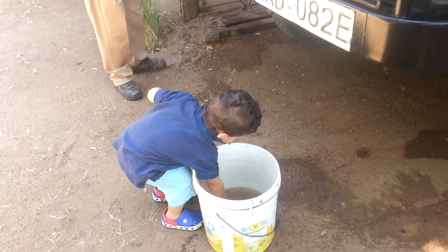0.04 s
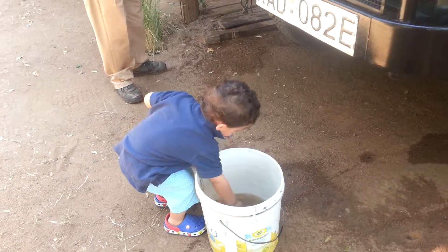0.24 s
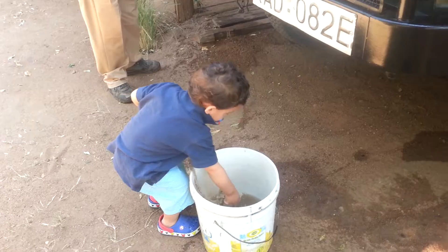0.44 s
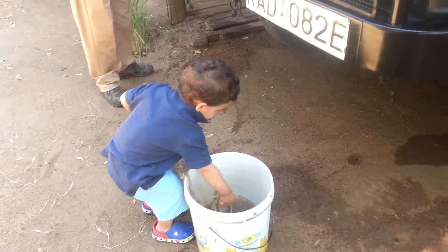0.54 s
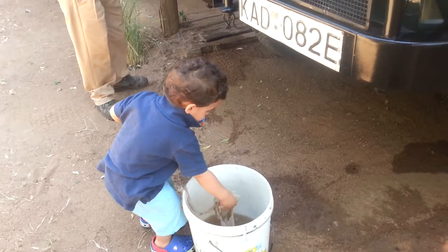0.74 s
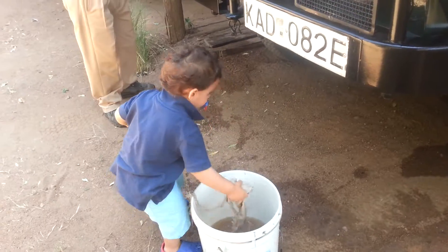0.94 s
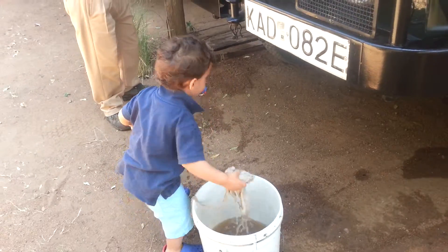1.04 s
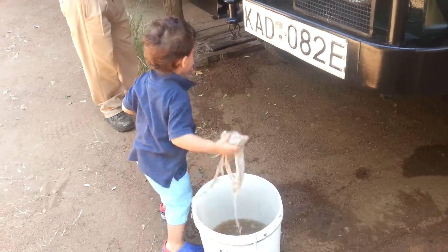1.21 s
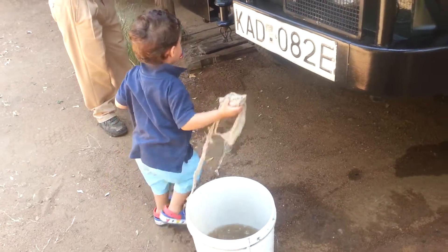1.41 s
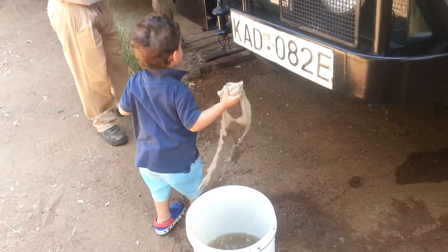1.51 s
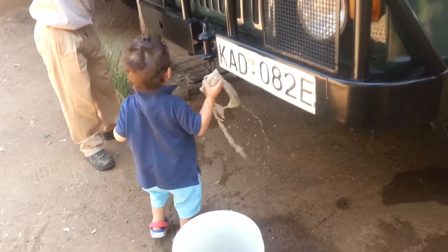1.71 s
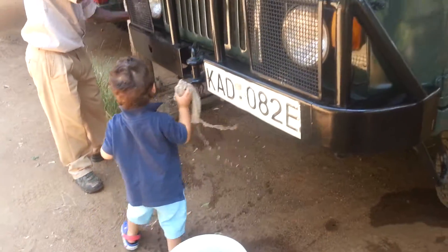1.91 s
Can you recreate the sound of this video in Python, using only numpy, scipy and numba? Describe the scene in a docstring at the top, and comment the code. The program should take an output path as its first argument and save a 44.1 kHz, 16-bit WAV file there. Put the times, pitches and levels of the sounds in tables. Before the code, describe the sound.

Water sloshes and drips as a wet rag is swished and lifted from a plastic bucket

```python
"""Open-air hush, a cricket's trill and a thin run of water are heard first; then a rag is swished in a plastic
bucket of water outdoors and lifted so that it drains back and onto the ground.
Water sounds are sums of decaying sines, one per bubble: large bubbles ring out among a few weaker neighbours,
drops and ticks free a few, splashes burst into dense clouds. Spray and open air are filtered noise; cricket,
a faint tone and a knock on the bucket wall are sines. Bucket mouth and wall colour and echo the bubbles."""
import sys
import numpy as np
from scipy import signal
from scipy.fft import rfft, irfft, next_fast_len
from scipy.io import wavfile
from scipy.ndimage import uniform_filter1d
from numba import njit

SR = 44100
rng = np.random.default_rng(int(sys.argv[2]) if len(sys.argv) > 2 else 0)


def wrap_up_sound(samples):
    """Save the sound to the file named by the first command line argument, as 16-bit audio."""
    columns = np.atleast_2d(samples).T
    # keep every value between -1 and 1, then stretch to whole-number steps
    tamed = np.clip(columns, -1, 1)
    steps = np.round(tamed * 32767).astype(np.int16)
    wavfile.write(sys.argv[1], SR, steps)


def volts(x):
    """Linear amplitude factor 10**(x/20) for a level x in dB, scalar or array-like."""
    e = np.asarray(x, float) / 20
    return 10 ** e


N = 85995  # length in samples

# Levels of bubbles, drops, ticks, splashes and running water are set ahead of the bucket's colour and echo.
# Water running off: (time [s], level [dB])
RUNNING_WATER = [(0, -54), (.18, -60.5), (.25, -41.5), (.42, -52), (.6, -61), (.7, -48.5), (.82, -54),
                 (.9, -51), (1.0, -53.5), (1.1, -44.5), (1.25, -45.5), (1.36, -49.5), (1.45, -50.5),
                 (1.6, -45), (1.72, -49), (1.79, -63.5), (1.95, -80)]
# Steady treble hiss of the spray: (time [s], level [dB])
SPRAY_HISS = [(0, -58), (.6, -58), (.7, -55.5), (1.0, -55), (1.37, -56), (1.55, -53), (1.74, -54),
              (1.8, -59.5), (1.95, -62.5)]
# Spectrum of the open air: (frequency [Hz], relative density [dB per Hz])
AIR_SPECTRUM = [(15, -56), (25, -19), (196, 1), (462, -3.5), (769, -4.5), (952, -11.5), (2180, -12),
                (3830, -15.5), (6040, -40), (15000, -31.5)]
# Open air over time: (time [s], level [dB])
AIR_OVER_TIME = [(0, -55), (1.95, -55)]
# Likeness of the left and right air: (frequency [Hz], correlation [-1..1])
AIR_LIKENESS = [(60, 0.079), (300, 0.43), (1000, 0.13), (4000, -0.57), (12000, -0.17)]
# Cricket trills: (start [s], end [s], level [dB])
CRICKET_TRILLS = [(0, 0.25, -70.5), (0.373, 0.63, -69), (0.68, 0.895, -69.5), (0.962, 1.11, -66),
                  (1.64, 1.733, -64), (1.887, 1.96, -68)]
# Fundamental of a faint steady tone: (time [s], level [dB])
TONE_LEVEL = [(.68, -78), (.97, -61.5), (1.05, -59), (1.2, -56), (1.27, -81)]
# Splashes: (time [s], level [dB], centre pitch [Hz], pitch spread [octaves], decay [s])
SPLASH_EVENTS = [(.24, -27, 1870, 0.52, 0.011), (.262, -25, 1920, 0.63, 0.022),
                 (.297, -31.5, 1860, 0.7, 0.0074), (.311, -42, 2060, 1.2, 0.0042),
                 (0.346, -36, 2060, 0.4, 0.0079), (0.886, -37.5, 1920, 0.49, 0.025),
                 (1.087, -33, 3660, 0.39, 0.033), (1.191, -28, 4520, 0.77, 0.066),
                 (1.26, -40.5, 512, 0.12, .04), (1.272, -34.5, 2130, 0.11, .004),
                 (1.429, -29.5, 2850, 0.11, 0.0079), (1.18, -32, 2650, 0.79, .015),
                 (1.318, -33, 2230, 0.18, 0.016), (1.41, -34, 2060, 0.51, 0.0057),
                 (1.566, -21.5, 1910, 0.43, 0.0063), (1.57, -28, 3800, 0.89, 0.014),
                 (1.615, -37, 1880, 0.22, 0.061)]
# Drops hitting the surface: (time [s], level [dB], pitch [Hz], left minus right [dB])
DROP_HITS = [(0.2467, -24, 1380, 1), (0.2575, -17, 2030, 0), (0.2603, -18, 1540, 2), (0.299, -28, 1600, 2),
             (0.4843, -41.5, 3860, -4), (0.6389, -40, 3480, -6), (0.682, -36.5, 3630, 2),
             (0.697, -31, 4120, 2), (0.8439, -23.5, 2720, 12.5), (0.8485, -28.5, 2950, -19),
             (0.8805, -32.5, 3120, -5), (0.8878, -35, 2010, 7), (0.9285, -29.5, 3740, -6),
             (0.9877, -34.5, 3470, -5), (1.0275, -34, 3590, -7), (1.115, -45, 4200, -7),
             (1.1283, -35.5, 3640, -12), (1.132, -32, 5260, 14), (1.1668, -28, 3840, 1),
             (1.1846, -22, 3800, -5.5), (1.2082, -21.5, 3760, -7), (1.2267, -25, 4900, 7.5),
             (1.232, -44, 4940, 18), (1.267, -24, 4290, -3), (1.391, -29, 3860, -5.5),
             (1.4805, -34, 3880, -6), (1.5105, -33.5, 3740, -6), (1.534, -19.5, 4910, 9.5)]
# Fine spray ticks: (time [s], level [dB], pitch [Hz], left minus right [dB])
SPRAY_TICKS = [(0.2583, -55, 7600, -3), (0.3101, -36, 7500, -5), (0.8878, -38, 11100, 0.5),
               (0.9108, -30.5, 10200, 6), (1.0205, -31.5, 7800, -6), (1.0278, -32, 8400, -5),
               (1.0353, -33, 6860, 6), (1.09, -25, 6360, 9), (1.1095, -37, 6500, 2),
               (1.1147, -30, 12800, 13), (1.1235, -26, 6050, 8), (1.128, -28, 10700, 0),
               (1.1493, -29, 9500, -3), (1.2525, -34, 8700, -7), (1.2632, -35, 11000, -2),
               (1.2675, -27.5, 9900, 1), (1.412, -26, 9000, -7), (1.5317, -18, 10640, 7),
               (1.609, -34.5, 8700, -12)]
# Large bubbles: (time [s], level [dB], pitch [Hz], ring t60 [s])
LARGE_BUBBLES = [(0.343, -42.5, 934, 0.016), (0.388, -39, 1496, 0.011), (0.694, -46.5, 1340, 0.017),
                 (0.716, -51, 1996, 0.03), (0.904, -49, 1310, 0.029), (1.06, -42.5, 1128, 0.029),
                 (1.077, -37, 798, 0.018), (1.091, -44.5, 744, 0.031), (1.129, -41, 770, 0.023),
                 (1.167, -38, 770, 0.03), (1.185, -41, 1247, 0.02), (1.19, -43.5, 756, 0.033),
                 (1.22, -41.5, 2014, 0.021), (1.2628, -29.5, 2216, 0.011), (1.412, -28.5, 1140, 0.0262),
                 (1.483, -47, 1673, 0.017), (1.723, -44.5, 724, 0.014)]
# Knock on the bucket wall: (time [s], level [dB], pitch [Hz], ring t60 [s])
WALL_KNOCK = [(1.566, -34, 299, 0.036)]
# Colour that the bucket mouth gives the water: (frequency [Hz], gain [dB])
MOUTH_GAIN = [(120, -26), (550, -1), (850, 2.5), (2000, 0), (2900, -3.5), (3900, 2), (5500, -2),
              (14000, 2.5)]


def over_time(table, column):
    """Linear interpolation: one column of a table at every sample."""
    a = np.array(table, float)
    return np.interp(np.arange(N) / SR, a[:, 0], a[:, column])


def on_hz(table, hz):
    """Spectral interpolation: a table read on a logarithmic frequency axis."""
    a = np.array(table, float)
    return np.interp(np.log(hz + 1), np.log(a[:, 0]), a[:, 1])


def band(lo_hz, hi_hz):
    """Filtered noise: two unrelated band noises with a joint rms of 1."""
    bandpass = signal.butter(2, [lo_hz, hi_hz], "band", fs=SR, output="sos")
    noise = signal.sosfilt(bandpass, rng.standard_normal((2, N)))
    return noise / noise.std()


@njit
def ring(g, sr, n):
    """Damped oscillation: each grain swells, rings as its pitch glides, and decays."""
    # grain: (time [s], pitch [Hz], t60 [s], rise [s], glide [1/s], left gain, right gain, decay shape)
    out = np.zeros((2, n))
    for r in range(len(g)):
        start, phase = int(g[r, 0] * sr), 0.
        for j in range(min(int(g[r, 2] * sr), n - start)):
            t = j / sr
            hz = min(g[r, 1] * (1 + g[r, 4] * t), .45 * sr)
            phase += 6.2831853 * hz / sr
            decay = np.exp(-6.9 * (t / g[r, 2]) ** g[r, 7])
            swell = 1 - np.exp(-t / g[r, 3])
            v = np.sin(phase) * decay * swell
            out[0, start + j] += g[r, 5] * v
            out[1, start + j] += g[r, 6] * v
    return out


def grains(s, hz, cycles, db, pan_db, rise=.07, glide=.2, shape=1.):
    """Scaling of oscillators: t60 in cycles, rise as a share of t60, glide as pitch share gained over t60."""
    hz = np.clip(hz, 100, 14000)
    t60 = np.maximum(cycles, 1) / hz
    left, right = volts(db + pan_db / 2), volts(db - pan_db / 2)
    columns = np.broadcast_arrays(np.maximum(s, 0), hz, t60, t60 * max(rise, 1e-3), glide / t60,
                                  left, right, shape)
    return np.column_stack(columns)


def cluster(s, db, hz, pan_db, length, octaves, count, cycles, scatter_db, pan_scatter_db,
            rest_db=0, rise_s=0):
    """Exponential arrivals: a leading bubble on the given pitch, the rest thinning out and fading."""
    u, z = rng.random((count, 3)).T, rng.standard_normal((count, 3)).T
    rest = np.minimum(np.arange(count), 1)  # 0 for the leading bubble, 1 for the others
    late = -np.log(1 - .95 * u[0]) * rest
    times = s + late * length + rise_s * u[2]
    pitches = hz * 2 ** (rest * octaves * 1.96 * np.tanh(z[0] / 2.18))
    levels = db + rest * (rest_db - 4 * late + scatter_db * z[1])
    pans = pan_db + rest * pan_scatter_db * z[2]
    return grains(times, pitches, cycles * (1 + rest * (u[1] - .5)), levels, pans)


def bursts(events, db):
    """Exponential decay: an envelope set off by each event, db relative to the event's level."""
    t60_s = 0.038
    hits = np.zeros(N)
    for e in events:
        hits[int(e[0] * SR)] += volts(e[1] + db)
    return signal.lfilter([1], [1, -np.exp(-np.log(1000) / (t60_s * SR))], hits)


def trickle(count=4500):
    """Superposition of many small bubbles: levels follow the running water, a few stand out as patter."""
    u, z = rng.random((count, 3)).T, rng.standard_normal((count, 2)).T
    i = (u[0] * (N - 1)).astype(int)
    stand_out_db = -3.5 * np.log(1 - u[2])
    db = over_time(RUNNING_WATER, 1)[i] - 4 + stand_out_db
    pitches = 2700 * 2 ** (0.704 * z[0])
    return grains(u[0] * N / SR, pitches, 14 * (0.61 + u[1]), db, 5 * z[1])


def spray():
    """Band noise under envelopes: steady hiss, bright bursts at ticks, duller at drops and splashes."""
    crack_db, splash_hiss_db = -24.5, -19  # relative to the level of each event
    steady = band(2000, 16400) * volts(over_time(SPRAY_HISS, 1))
    bright = band(3200, 14500) * bursts(SPRAY_TICKS, crack_db)
    splash_envelope = uniform_filter1d(bursts(SPLASH_EVENTS, splash_hiss_db), size=150)
    dull = band(2400, 6600) * (splash_envelope + bursts(DROP_HITS, crack_db))
    return steady + bright + dull


def air():
    """Partly correlated noise: a hush whose mid and side shares set the likeness of left and right."""
    hz = np.arange(N // 2 + 1) * SR / N
    likeness = np.clip(on_hz(AIR_LIKENESS, hz), -.95, .95)
    mid, side = rfft(rng.standard_normal((2, N))) * volts(on_hz(AIR_SPECTRUM, hz))
    mid = irfft(mid * np.sqrt(1 + likeness), N)
    side = irfft(side * np.sqrt(1 - likeness), N)
    x = np.array([mid + side, mid - side])
    return x / x.std() * volts(over_time(AIR_OVER_TIME, 1))


def cricket():
    """Amplitude modulation: a high sine throbs at the stroke rate within smoothed trills."""
    pitch_hz, strokes_hz, stroke_depth = 5895, 275, 0.17
    t = np.arange(N) / SR
    trills = sum(volts(db) * ((t > a) & (t < b)) for a, b, db in CRICKET_TRILLS)
    gate = uniform_filter1d(trills, size=900)
    throb = 1 + stroke_depth * np.cos(2 * np.pi * strokes_hz * t)
    chirp = gate * throb * np.sin(2 * np.pi * pitch_hz * t)
    return chirp * volts(np.array([[1.5], [-1.5]]))  # left 3 dB above right


def tone():
    """Harmonic addition: a faint steady fundamental with its third partial."""
    pitch_hz, third_db = 1260, 0.5  # third partial relative to the fundamental
    phase = 2 * np.pi * pitch_hz * np.arange(N) / SR
    return volts(over_time(TONE_LEVEL, 1)) * (np.sin(phase) + volts(third_db) * np.sin(3 * phase))


def splashes():
    """Bubble clouds of many sizes: the small, short ones are set louder so that the cloud stays bright."""
    grain_db, rise = -9, .6  # one bubble relative to the splash; build-up as a share of the decay
    clouds = []
    for s, db, hz, octaves, decay in SPLASH_EVENTS:
        g = cluster(s, db + grain_db, hz, 0, decay, octaves, count=180, cycles=8.5,
                    scatter_db=2.5, pan_scatter_db=6.5, rise_s=rise * decay)
        g[:, 5:7] *= np.sqrt(g[:, 1:2] / hz)
        clouds.append(g)
    return np.vstack(clouds)


def drops():
    """Entrained bubbles: each drop frees a few near one size."""
    spread_s, ring_t60_s = .003, .005
    return np.vstack([cluster(s, db, hz, pan, spread_s, 0.11, count=6, cycles=ring_t60_s * hz,
                              scatter_db=4.5, pan_scatter_db=3.5, rest_db=-5)
                      for s, db, hz, pan in DROP_HITS])


def snaps():
    """Broadband impact: very short grains spread over octaves as each drop or tick lands."""
    return np.vstack([cluster(s, db - 10, hz * 1.6, pan, 0.0013 / 4, .5, count=4, cycles=5,
                              scatter_db=2, pan_scatter_db=4)
                      for s, db, hz, pan in DROP_HITS + SPRAY_TICKS])


def ticks():
    """Small-bubble resonance: spray ticks spread wider in pitch than drops."""
    return np.vstack([cluster(s, db, hz, pan, 0.0013, 0.23, count=6, cycles=18.8,
                              scatter_db=2.5, pan_scatter_db=12.5, rest_db=-8.5)
                      for s, db, hz, pan in SPRAY_TICKS])


def bubbles():
    """Bubble resonance: near-pure tones swell, hold and collapse, among a few smaller neighbours."""
    s, db, hz, t60 = np.array(LARGE_BUBBLES).T
    large = grains(s, hz, t60 * hz, db, 0, rise=.14, glide=.01, shape=3.2)
    neighbours = [cluster(s, db - 11, hz * 1.24, 0, t60 / 4, 0.46, count=5, cycles=9.6,
                          scatter_db=4, pan_scatter_db=8)
                  for s, db, hz, t60 in LARGE_BUBBLES]
    return np.vstack([large] + neighbours)


def knock():
    """Damped wall mode: a low sine at constant pitch rings and dies away."""
    s, db, hz, t60 = np.array(WALL_KNOCK).T
    return ring(grains(s, hz, t60 * hz, db, 0, rise=0.071, glide=0), 1. * SR, N)


def mouth(x):
    """Linear filtering: the bucket mouth thins the bass and shapes the treble."""
    m = next_fast_len(N)
    hz = np.arange(m // 2 + 1) * SR / m
    return irfft(rfft(x, m) * volts(on_hz(MOUTH_GAIN, hz)), m)[:, :N]


def bucket(x):
    """Reflection: a slap from the bucket wall and a short diffuse tail join the direct sound."""
    echo_s, echo_db, tail_t60_s, tail_db = .0048, -14, .12, -11
    t = np.arange(int(.25 * SR)) / SR
    tail = rng.standard_normal((2, len(t))) * np.exp(-np.log(1000) * t / tail_t60_s) * (t > .002)
    h = volts(tail_db) * tail / np.sqrt(np.sum(tail ** 2, axis=1, keepdims=True))
    h[:, 0] += 1  # direct sound
    h[:, int(echo_s * SR)] += volts(echo_db)
    return signal.fftconvolve(x, h, axes=1)[:, :N]


def scene():
    """Superposition: water inside the bucket, the knock, spray and surroundings."""
    water_grains = np.vstack([trickle(), splashes(), drops(), snaps(), ticks(), bubbles()])
    water = bucket(mouth(ring(water_grains, 1. * SR, N)))
    return water + spray() + air() + cricket() + tone() + knock()


def band_limit(x):
    """A steep low-pass at the top of the band."""
    return signal.sosfilt(signal.butter(12, 15630, fs=SR, output="sos"), x)


def record(dry):
    """Elliptic low-pass filtering: the top of the spectrum is cut steeply at 14550 Hz."""
    low_pass = signal.ellip(6, .5, 32, 14550, fs=SR, output="sos")
    mix = signal.sosfilt(low_pass, dry)
    return band_limit(mix)


dry = scene()
out = record(dry)
wrap_up_sound(out)
```